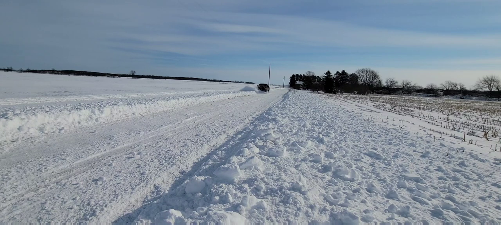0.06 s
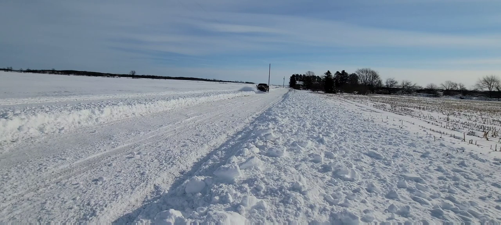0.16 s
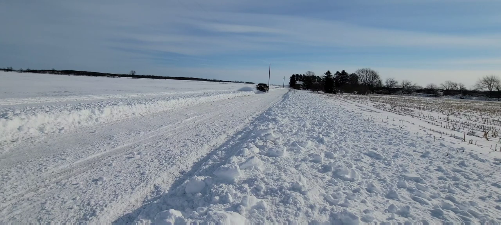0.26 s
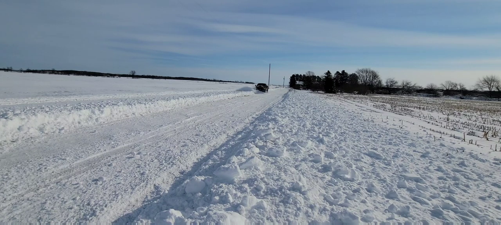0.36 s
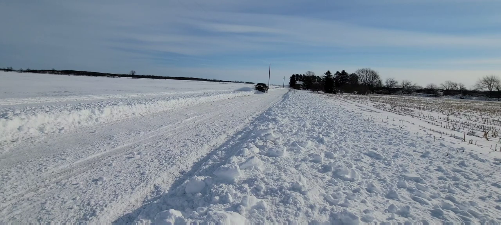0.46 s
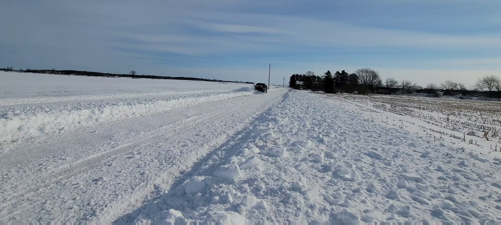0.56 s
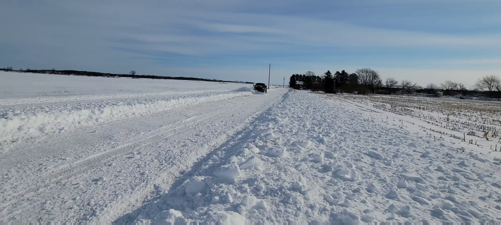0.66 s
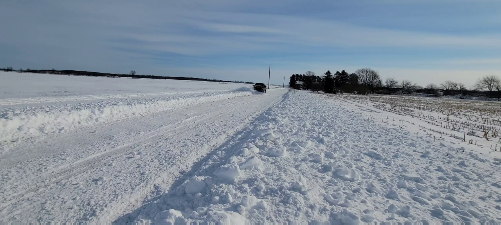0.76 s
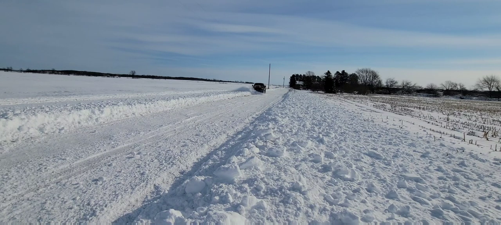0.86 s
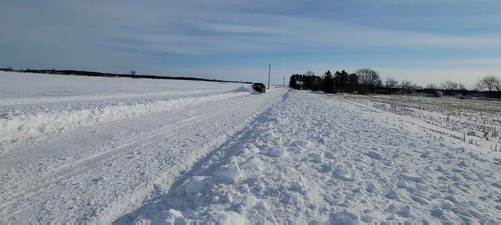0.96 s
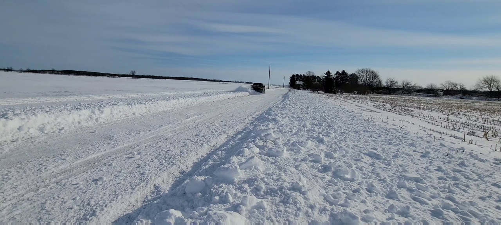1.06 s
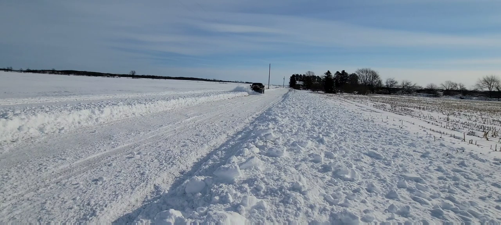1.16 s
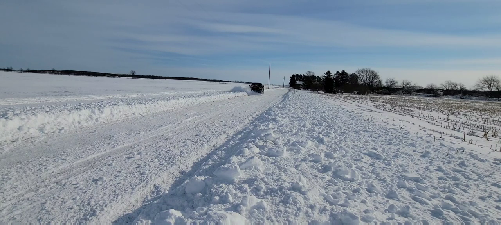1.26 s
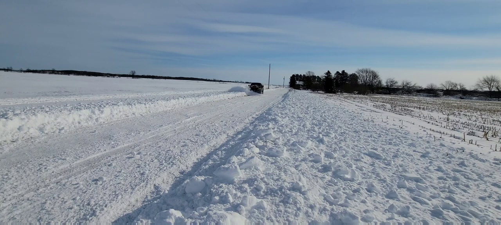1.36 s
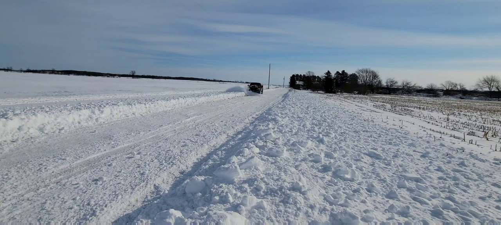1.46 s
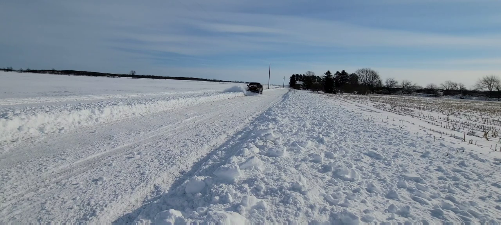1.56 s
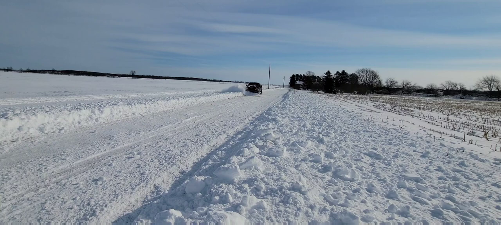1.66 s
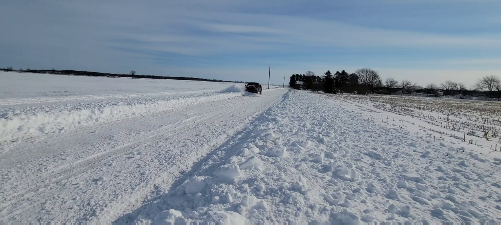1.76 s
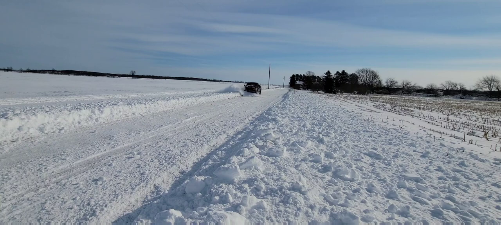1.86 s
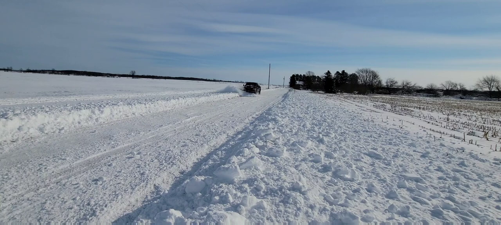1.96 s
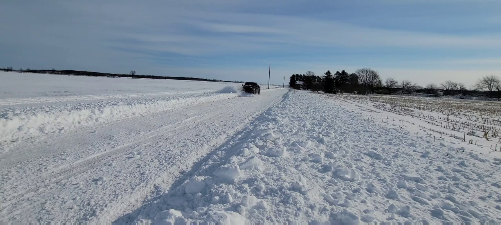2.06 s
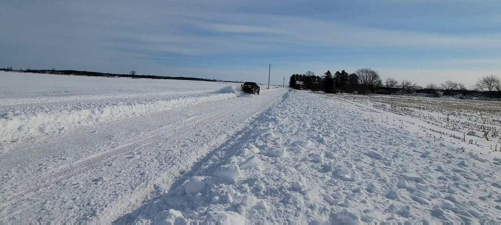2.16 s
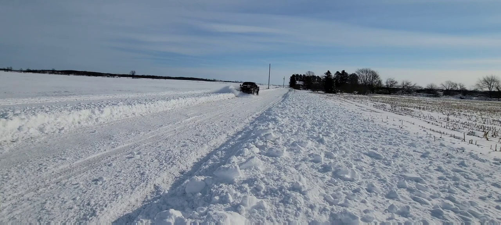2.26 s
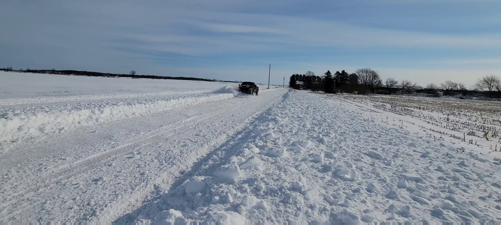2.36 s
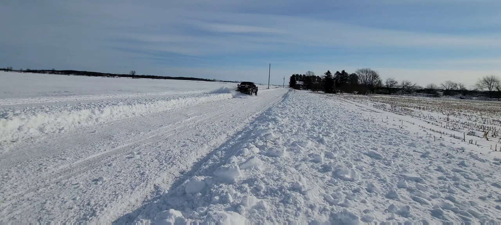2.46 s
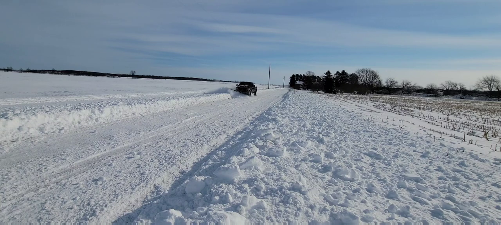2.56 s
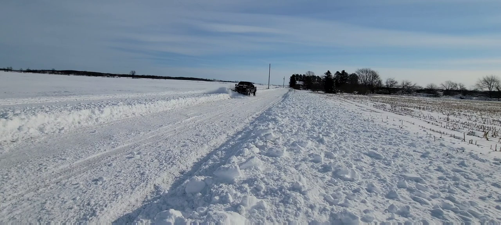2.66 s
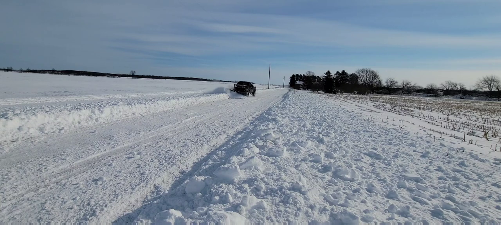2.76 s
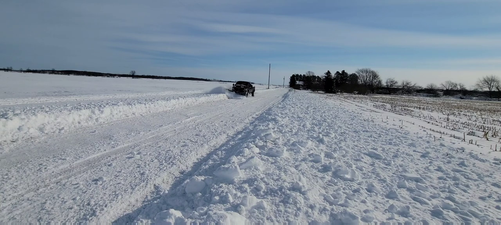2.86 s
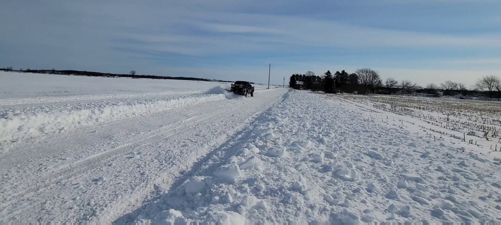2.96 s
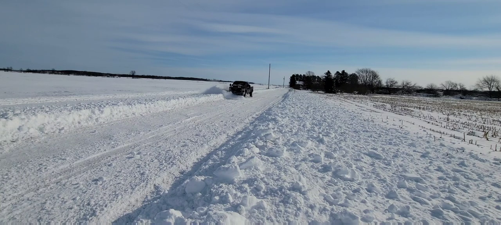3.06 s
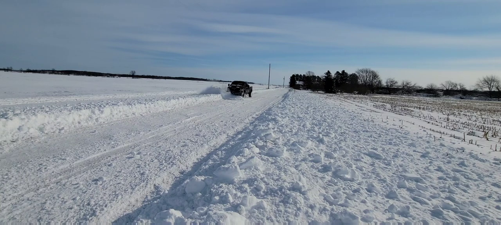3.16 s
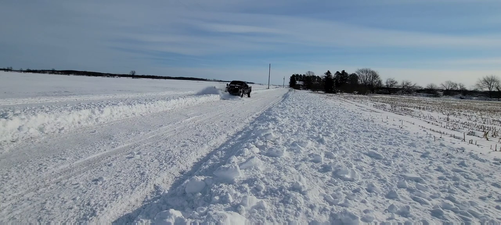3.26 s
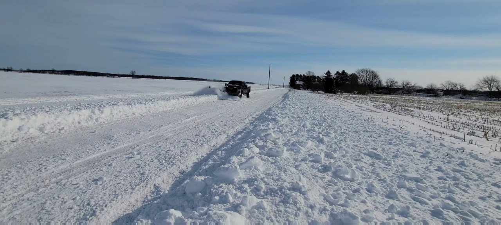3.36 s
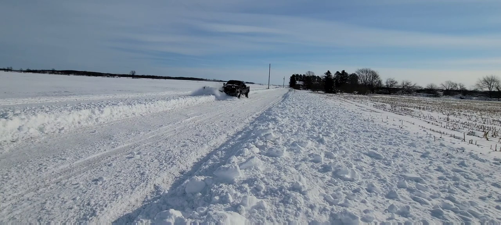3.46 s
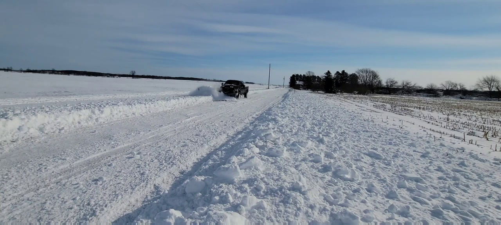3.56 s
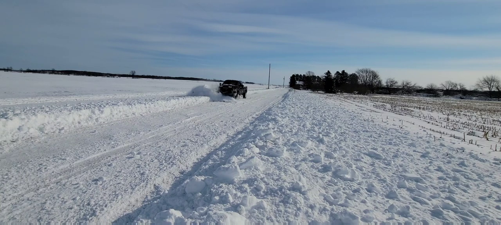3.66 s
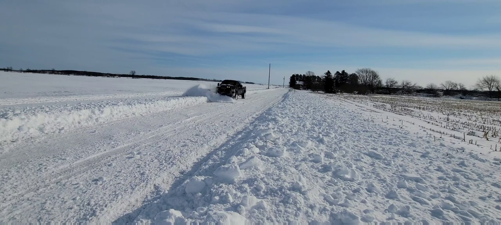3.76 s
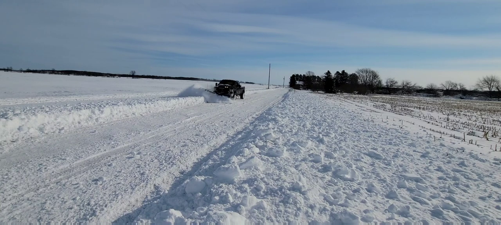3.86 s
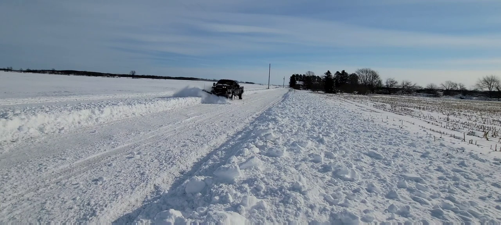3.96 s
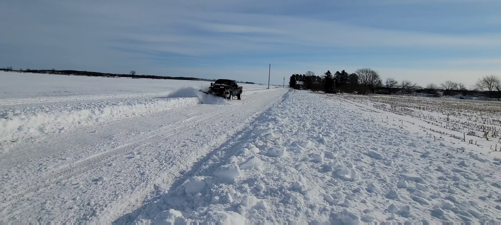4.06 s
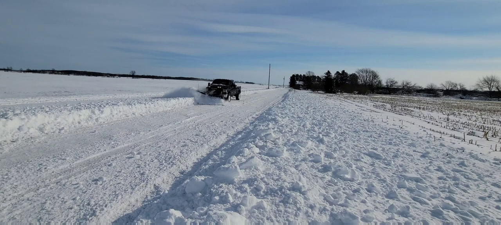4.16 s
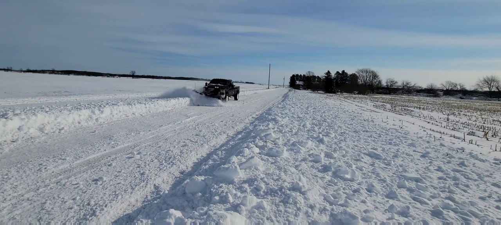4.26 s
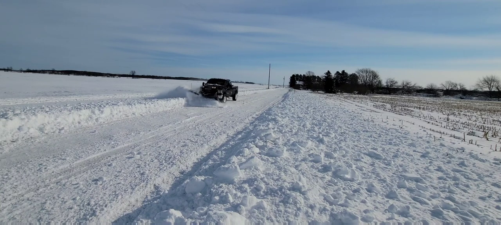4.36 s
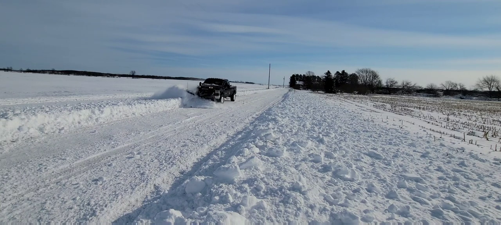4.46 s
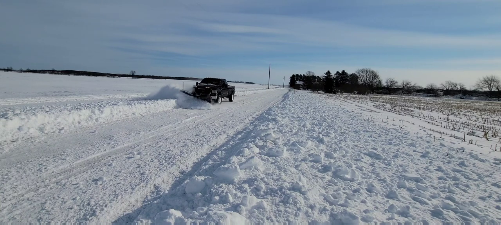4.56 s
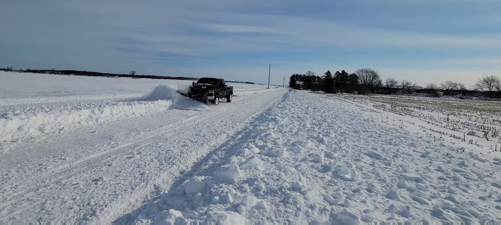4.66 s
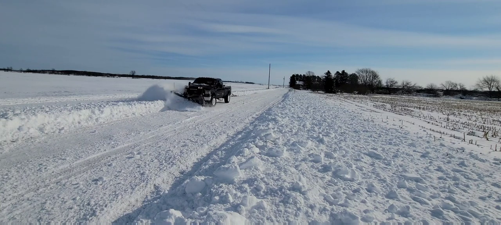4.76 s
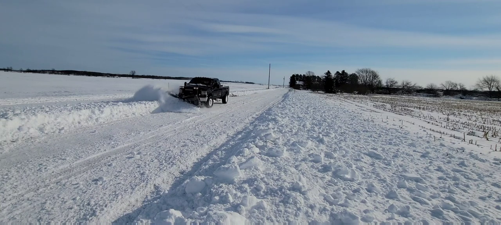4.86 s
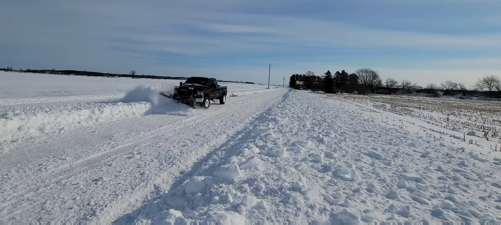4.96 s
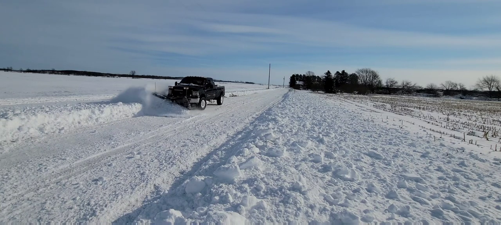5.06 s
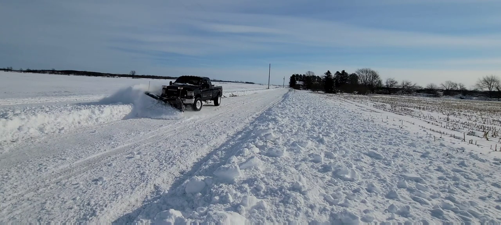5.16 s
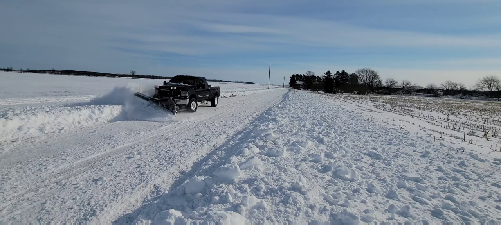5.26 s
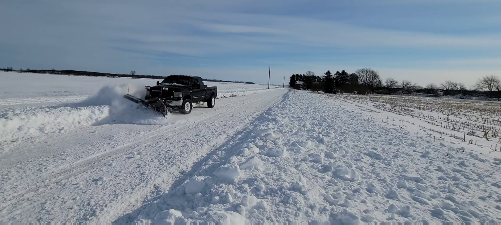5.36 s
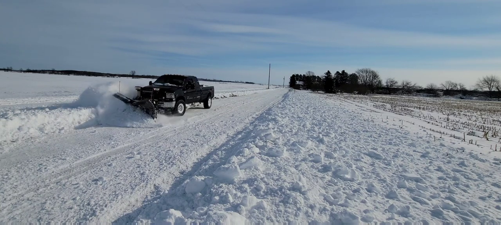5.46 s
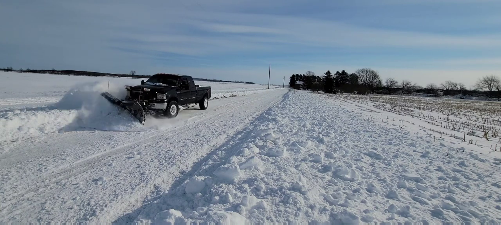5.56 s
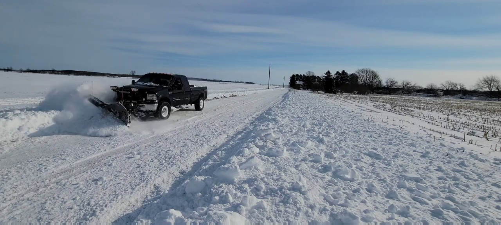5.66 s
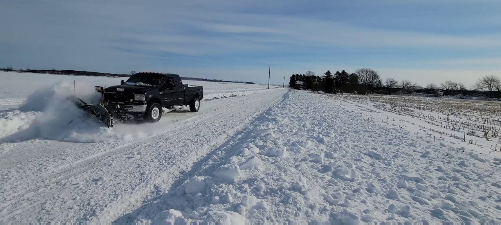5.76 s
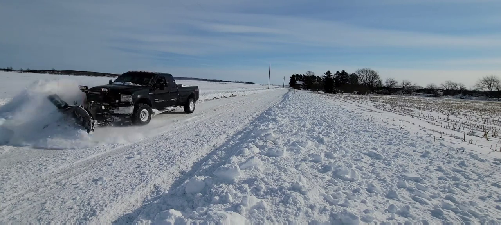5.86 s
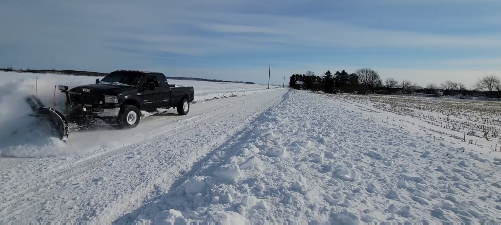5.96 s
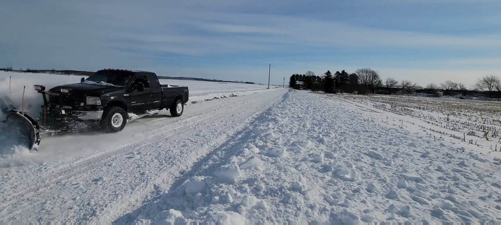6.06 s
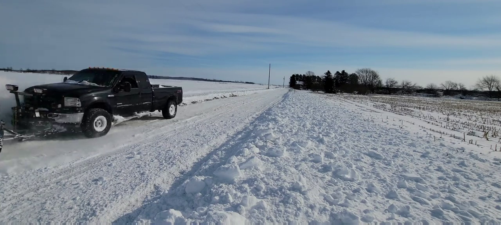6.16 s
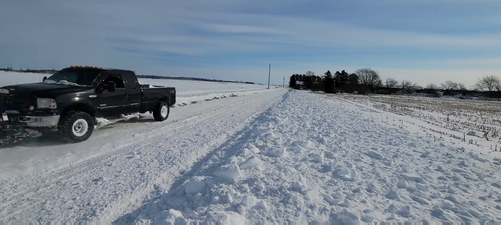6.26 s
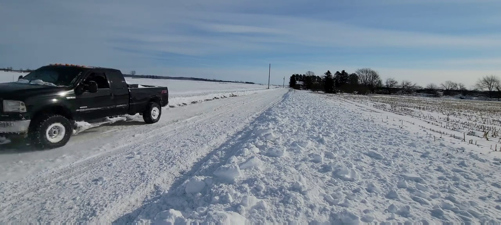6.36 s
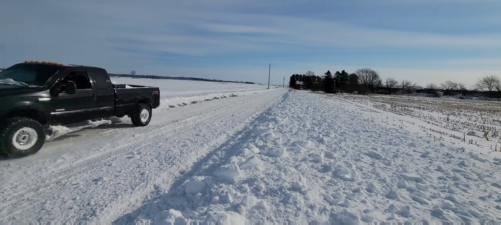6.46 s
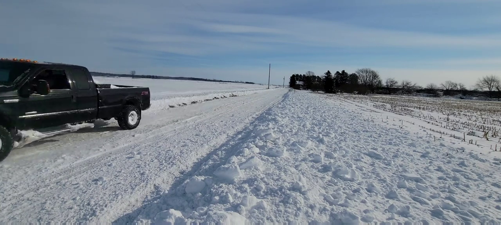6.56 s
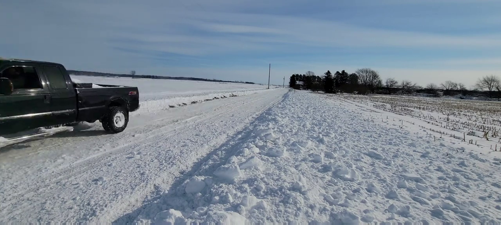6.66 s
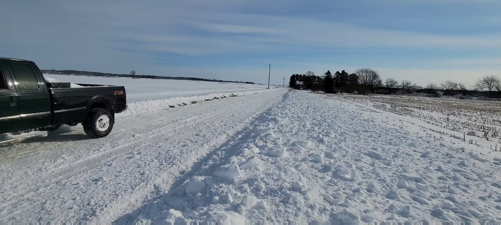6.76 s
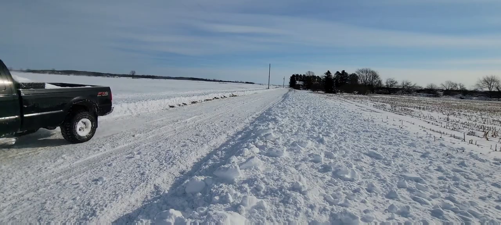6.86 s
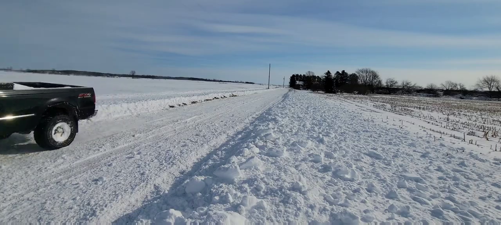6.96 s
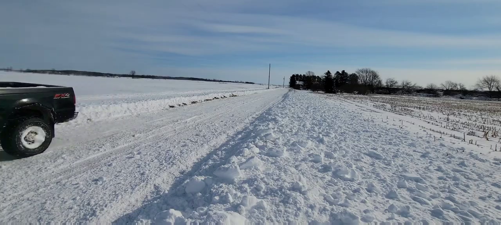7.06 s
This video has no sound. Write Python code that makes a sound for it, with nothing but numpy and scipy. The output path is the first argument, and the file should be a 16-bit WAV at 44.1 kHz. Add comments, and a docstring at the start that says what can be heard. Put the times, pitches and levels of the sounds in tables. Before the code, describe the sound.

Heard in wide stereo from a phone beside a country road, a pickup plows snow toward the listener. The low engine drone rises and dips under a rough, crunching scrape and frequent thuds from the blade. Everything builds as the truck approaches, with the heaviest bangs late on. Loose steel parts then rattle and squeak over a thin whine, with the truck close on the left.

```python
"""An engine drones in the distance, then grows louder: a pickup is plowing a snowy country road.
Its eight cylinders fire in turn to make the drone, which swells with three pushes of the throttle.
The blade scrapes, rumbles and bangs on frozen bumps, while steel parts squeak and clink.
With a faint, high whine, the truck draws almost level on the left of a phone, whose two microphones
hear it with a growing gap in time. The phone then widens the stereo."""
import sys
import numpy as np
from scipy import signal
from scipy.fft import rfft, irfft
from scipy.io import wavfile
from scipy.ndimage import uniform_filter1d, map_coordinates

SR = 44100
rng = np.random.default_rng(int(sys.argv[2]) if len(sys.argv) > 2 else 0)


def int16_out(signal):
    """Quantize to a 16-bit WAV file."""
    q = np.round(np.clip(np.atleast_2d(signal).T, -1, 1) * 32767)
    wavfile.write(sys.argv[1], SR, q.astype(np.int16))


N = 312838
TIME = np.arange(N) / SR
SPEED_M_S, LEVEL_AT_S, KERB_M = 7.7, 7.296, 6.24  # a straight path, KERB_M to the side of the phone

# Short steel squeaks and one long, faint whine.
# Each row: start in seconds, length in seconds, pitch in Hz, level in dB.
SQUEAKS_AND_WHINE = [(0.312, 0.055, 1500, -57), (.58, 0.11, 1470, -54), (1.02, 0.05, 1480, -47),
                     (1.13, 0.051, 1530, -42.5), (1.495, .05, 1510, -48), (2.294, 0.06, 2870, -46.5),
                     (5.286, 0.21, 14350, -42), (5.375, .12, 15550, -56), (5.692, 0.052, 14090, -40),
                     (5.76, 0.084, 14300, -36.5), (5.935, 0.088, 1370, -41), (5.914, 0.22, 14300, -34),
                     (5.917, 0.091, 15600, -39), (6.07, 0.067, 15580, -42), (5.954, 1.1, 10600, -53),
                     (6.946, 0.04, 14500, -33.5)]
# Loose parts knocking. Each row: start in seconds, strength in dB.
CLINKS = [(5.873, -19), (6.234, -25), (6.355, -20), (6.5005, -10.5), (6.591, -19.5), (6.7211, -11),
          (6.775, -15), (6.9227, -21)]
# The notes of a steel link. Each row: pitch in Hz, level in dB, seconds to fade by 60 dB.
LINK_NOTES = [(5230, 4, .07), (5600, -1, .09), (6630, -2, .05), (7100, -7, .05), (8260, -6, .09),
              (12440, -16, .06), (14950, -14, .05)]
# The blade on the road. Each row: time in seconds, scrape swell in dB, treble swell in dB.
BLADE_SWELLS = [(0, -2.5, -1), (.59, -11.5, -1), (1.18, -1, 0.5), (1.78, 0, 0.5), (2.15, 5, 6),
                (2.59, -0.5, -5.5), (3.1, 1, -5), (3.57, 5.5, 2.5), (4.11, -1.5, 0.5), (4.88, 5.5, 3),
                (5.31, 4, 5), (5.86, 1, 2.5), (6.26, -5, -1), (6.71, -1.5, 3.5), (7.09, -8.5, -2)]
# Rumble, crunch, scrape, edge ring, hiss and spray. Each row: base level in dB, how steeply it grows
# with nearness, then how much it follows the scrape swell, the treble swell and the firing tone.
BLADE_LAYERS = [(-22, 1.16, 0.64, .02, -0.15), (-21, 1.43, 0.34, 0.026, 0.1648),
                (-29.5, 1.11, 1.09, .02, 0.02), (-36, 1.014, 0.018, 1.25, 0.02),
                (-34.5, 1.17, 0.27, 0.52, 0), (-36, 1.115, .02, 0.057, 0.28)]
# The borders in Hz of the five layers above the rumble.
LAYER_EDGES_HZ = (200, 700, 2000, 3800, 8500, 16000)
# The tone of the rumble, the scraping and a bang. Each row: frequency in Hz, level in dB.
RUMBLE_TONE = [(20, -38), (40, -1.5), (65, 5.5), (90, -1), (130, 1), (200, -2.5), (260, -30)]
SCRAPE_TONE = [(200, 0), (390, -5.5), (500, -11), (1000, -8), (1500, -8), (2050, -18.5), (3000, -14.5),
               (3700, -20.5), (4600, -23.5), (5600, -19.5), (7200, -26), (9800, -35.5), (10900, -35),
               (12400, -25.5), (16000, -35)]
BANG_TONE = [(120, -15), (200, -0.5), (273, -8.5), (409, -12), (1270, -9), (2050, -20), (2560, -25),
             (5230, -28.5), (5940, -30.5), (8420, -41.5), (10900, -50), (12400, -39), (16000, -50)]
# Frozen bumps. Each row: start in seconds, level in dB, extra dB for the boom, extra dB for the crack.
BANGS = [(0.154, -43, -1, -8), (0.277, -48, -10.5, 3.5), (0.4, -46, -10, -3), (0.759, -47, -3, 5),
         (0.783, -47, -10, 5.5), (0.875, -33.5, -6, -5.5), (0.968, -35.5, -4, -4.5), (1.06, -35.5, -1, -6),
         (1.082, -34, -7, -8), (1.223, -28, -0.5, -7.5), (1.34, -38, -12, -14), (1.421, -41, -5, -1),
         (1.538, -28.5, -4, -10), (1.572, -38, -10, -20), (1.639, -39, 4, -5.5), (1.767, -43.5, 11, 7.5),
         (2.008, -29, -16, -8.5), (2.029, -31.5, -4, -2), (2.056, -19.5, -2.5, -2), (2.081, -25, -23, -17),
         (2.149, -23.5, -5, -9.5), (2.209, -33, 4.5, -11.5), (2.28, -36.5, -10, -2.5),
         (2.427, -35, 2.5, -17), (2.596, -31, -6, -13), (2.643, -35.5, 3.5, -23), (2.789, -27.5, -6, -10),
         (2.992, -31.5, -5, -30), (3.124, -27.5, 1.5, -14), (3.253, -29, -1, -11.5),
         (3.539, -25.5, -18, -26), (3.566, -19, 0, -5), (3.626, -27, -21, -11), (3.701, -31, 9.5, -6),
         (3.891, -29.5, -3, -29), (4.134, -33, 2, -17), (4.3, -32, 2, -25), (4.378, -31, -14, -19),
         (4.49, -37, -14, -20), (4.567, -25, -22, -14), (4.643, -23, -19, -6), (4.758, -30.5, -24, -27),
         (4.839, -25, -14, -27), (4.933, -28, 5, -29), (5.25, -12, 1, -5), (5.289, -27, -10, -0.5),
         (5.371, -21, 5.5, -9), (5.596, -14, 2.5, 0), (5.699, -43, 0, 7), (5.771, -22.5, -2, -1.5),
         (5.87, -33, -3, 5.5), (5.909, -16.5, 2, 5), (6.163, -30.5, 3.5, 0), (6.456, -26, 6, -14),
         (6.889, -23.5, -8, -7), (6.931, -18, -10, -2.5)]
# The blade's low notes. Each row: pitch in Hz, level in dB, seconds to fade by 60 dB.
BOOM_NOTES = [(87.7, 7, 0.16), (124.1, 3.5, 0.17), (62.6, -35, 0.18)]
# The throttle. Each row: time in seconds, firings per second, firing tone in dB at the kerb distance.
THROTTLE = [(0, 147.5, -19.5), (.6, 152, -9), (1.05, 153.8, -8.5), (1.35, 146.6, -11.5), (1.55, 140, -24),
            (2.0, 129.7, -22), (3, 131.3, -22), (3.3, 141.6, -17.5), (3.85, 147, -15), (4.5, 150, -9.5),
            (5, 152.6, -6), (5.15, 150.5, -8), (5.24, 139.6, -18), (5.8, 136.7, -19.5), (6.3, 141.4, -24),
            (6.55, 140.2, -25.5), (6.75, 138.9, -17), (7.09, 140.1, -18)]
# Tones from uneven cylinders. Each row: multiple of the engine's cycle rate, relative level in dB.
UNEVEN_TONES = [(3, -22), (5, -9), (6, -6), (7, -14.5), (9, -6.5), (10, -1), (11, -7), (12, -14), (16, -16),
                (18, -16)]
# The phone's body shades the mid range. Each row: time in seconds, left minus right in dB.
PHONE_SHADE = [(0, -4), (2.5, -2), (4, 0.1), (5, 1.6), (5.8, 3.5), (6.4, 3.5), (7.09, 4)]
# How the two microphones differ. Each row: frequency in Hz, left minus right in dB.
MIC_BALANCE = [(200, -0.5), (600, -0.66), (2500, -2.5), (4500, -8.5), (6000, -4.5), (7000, 1), (10500, 6),
               (12000, -7), (13500, 3.5), (15500, 14)]
# Sound scattered by snow banks. Each row: frequency in Hz, scattered share of the power in dB.
SCATTER_SHARE = [(30, -9), (120, -28), (600, -22.5), (2000, -14), (4000, -5), (8000, -2.5), (15000, -3)]
# Stereo widening. Each row: frequency in Hz, boost of the left-right difference in dB.
WIDENING = [(150, 4), (260, 1), (400, 6.5), (900, 3), (2000, -0.5), (5000, 0)]


def undb(db):
    """Turn decibels into a multiplier."""
    return 10 ** (np.asarray(db) / 20)


def curves(table):
    """Join a table's timed points with straight lines, one curve per column."""
    seconds, *columns = np.transpose(table)
    return [np.interp(TIME, seconds, column) for column in columns]


def colour(x, table=((1, 0),), lo=0.74, hi=SR, slope=8):
    """Filter by (Hz, dB) points, fading out below lo and above hi."""
    hz = np.maximum(np.fft.rfftfreq(N, 1 / SR), 1)
    point_hz, point_db = np.transpose(table)
    gain = undb(np.interp(np.log(hz), np.log(point_hz), point_db))
    edge_loss = np.sqrt((1 + (lo / hz) ** slope) * (1 + (hz / hi) ** slope))
    return irfft(rfft(x) * gain / edge_loss, N)


def noise(table, lo=1., hi=SR):
    """Filtered noise with a typical size of 1."""
    x = colour(rng.standard_normal(N), table, lo, hi)
    return x / np.std(x)


def wander(rate):
    """A smooth random wobble of size about 1, with `rate` new values a second."""
    hold = int(SR / rate)
    steps = np.repeat(rng.standard_normal(N // hold + 1), hold)
    smooth = uniform_filter1d(uniform_filter1d(steps, hold), hold)[:N]
    return smooth / np.std(smooth)


def ring(x, hz, fade_s):
    """One note, struck by x, that dies away."""
    pole = np.exp(2j * np.pi * hz / SR - np.log(1000) / (fade_s * SR))
    return signal.lfilter([1], [1, -pole], x).imag


def distance():
    """Metres from truck to phone."""
    return np.hypot(SPEED_M_S * (TIME - LEVEL_AT_S), KERB_M)


def beyond(metres):
    """0 while the truck is well inside this distance, 1 well outside."""
    return 1 / (1 + (metres / distance()) ** 8)


def snow_scatter(x):
    """Many small echoes off the snow banks shuffle the timing (phase) of the waves."""
    slices = signal.stft(x, nperseg=512)[2]
    shuffled = slices * np.exp(2j * np.pi * rng.random(slices.shape))
    echoes = signal.istft(shuffled, nperseg=512)[1][:N]
    return echoes * np.std(np.diff(x)) / np.std(np.diff(echoes))


def squeaks_and_whine():
    """Short steel squeaks, plus one faint, thin, high whine as the truck draws near."""
    out, flutter = np.zeros(N), undb(1.36 * wander(60))
    for start, length, hz, db in SQUEAKS_AND_WHINE:
        i, n = int(start * SR), int(length * SR)
        edges = hz * (1 + 0.023 * np.array([-.5, .5]))  # 2.3% of the pitch wide
        band = signal.butter(1, edges, "band", fs=SR, output="sos")
        tone = signal.sosfilt(band, rng.standard_normal(2 * SR))
        out[i:i + n] += undb(db) * tone[SR // 2:][:n] / np.std(tone) * signal.windows.tukey(n, .3)
    return out * flutter


def clinks():
    """Loose steel rattles and rings; each knock brings out a new mix of its notes."""
    starts, db = np.transpose(CLINKS)
    mix_db = 3.4 * rng.standard_normal((len(starts), len(LINK_NOTES)))
    knocks = np.zeros(N)
    knocks[(starts * SR).astype(int)] = undb(db)
    burst = rng.standard_normal(600) * np.exp(-np.arange(600) / 150)
    rattle = np.convolve(knocks, burst)[:N]
    out = colour(rattle, [(3000, -32), (5000, -24), (7500, -12), (9500, -12), (12000, -6), (15500, -11)])
    last_knock = np.clip(np.searchsorted(starts, TIME) - 1, 0, None)
    for k, (hz, note_db, fade_s) in enumerate(LINK_NOTES):
        out += ring(rattle * undb(note_db - 29 + mix_db[last_knock, k]), hz, fade_s)
    return out


def blade_scrape():
    """The blade drags along in six layers of noise; lumps of ice jolt all but the rumble."""
    scrape_db, treble_db = curves(BLADE_SWELLS)
    push_db = curves(THROTTLE)[1]  # a harder push throws more snow
    near_db = 20 * np.log10(KERB_M / distance())
    rumble_db, *layer_db = [db + near * near_db + scrape * scrape_db + treble * treble_db + push * push_db
                            for db, near, scrape, treble, push in BLADE_LAYERS]
    lumps = (rng.random(N) < 40 / SR) * undb(-14 * rng.random(N))  # about 40 a second
    jolt = uniform_filter1d(signal.lfilter([1], [1, -np.exp(-1 / (0.0071 * SR))], lumps), size=100)
    jolt *= np.interp(TIME, [5.8, 6.3], [1, .4])  # close by, smooth tyre rush takes over
    out = undb(rumble_db + 2.9 * wander(20)) * noise(RUMBLE_TONE, hi=330)
    shared = wander(16)
    roughness = [(.77, .28, 1.23), (1.46, .77, 2.5), (1.2, .23, 1.7), (.95, .2, 1.5), (.39, .23, .52)]
    for db, lo, hi, rough in zip(layer_db, LAYER_EDGES_HZ, LAYER_EDGES_HZ[1:], roughness):
        jolt_share, shared_db, own_db = rough
        flicker_db = shared_db * shared + own_db * wander(25)
        out += undb(db + flicker_db) * (1 + jolt_share * jolt) * noise(SCRAPE_TONE, lo, hi)
    return out


def blade_bangs(near_fade_s=0.28, far_fade_s=0.14):
    """Each bump thuds, cracks and sets the blade booming, and its edge chatters on over the ice."""
    kicks, loudness = np.zeros(N), np.zeros((3, N))
    edges_hz = (200, 750, 2300, 16000)  # three bands: thud, middle, crack
    fade_speeds = np.array([[.8], [1], [1.2]])
    thud_db = 0.5 - 10.5 * beyond(metres=16.4)  # far off, snow soaks up the thud
    fade_s = near_fade_s + (far_fade_s - near_fade_s) * beyond(metres=14.6)
    t = TIME[:SR // 2]
    rise = 1 - np.exp(-t / 0.0018)
    for start, db, boom_db, crack_db in BANGS:
        i = int(start * SR)
        pace, phase = rng.random(2)
        chatter = 1 + 0.11 * np.sin(2 * np.pi * ((60 + 50 * pace) * t + phase))
        fall = 0.72 * np.exp(-t / 0.0044) + 0.94 * chatter * 1000 ** (-t / fade_s[i])
        gains = undb(db + np.array([[thud_db[i]], [0], [crack_db]]))
        loudness[:, i:i + len(t)] += (gains * rise * fall ** fade_speeds)[:, :N - i]
        kicks[i + 90] += undb(db + boom_db)
    hits = sum(level * noise(BANG_TONE, lo, hi) for level, lo, hi in zip(loudness, edges_hz, edges_hz[1:]))
    return hits + sum(undb(db) * ring(kicks, hz, fade) for hz, db, fade in BOOM_NOTES)


def steel_plates(x, ripple_db=2.0, spacing_hz=45):
    """The many notes of the blade's plates lift some pitches and lower others, above the bass."""
    hz = np.arange(200, 16000, spacing_hz)
    db = (hz > 300) * ripple_db * rng.standard_normal(1000)[:len(hz)]
    return colour(x, np.transpose([hz, db]))


def engine():
    """Eight firings a cycle make the exhaust drone; cylinders that differ add wavering tones."""
    firing_hz, tone_db = curves(THROTTLE)
    cycle = 2 * np.pi * np.cumsum(firing_hz * (1 + .003 * wander(12))) / (8 * SR)
    out = undb(tone_db + 1.2 * wander(25)) * np.sin(8 * cycle)
    bank_db = -27.5 - 0.089 * tone_db + 3 * wander(14)
    out += undb(bank_db) * np.sin(4 * cycle)  # a bank is one row of four cylinders
    for multiple, db in UNEVEN_TONES:
        uneven_db = db - 23 + 0.2 * tone_db + 2.5 * wander(5)
        out += undb(uneven_db) * np.sin(multiple * cycle + rng.uniform(0, 2 * np.pi))
    return np.sqrt(2) * out * KERB_M / distance()


def scene():
    """The truck reaches both microphones, partly direct and partly scattered."""
    truck = engine() + steel_plates(blade_scrape() + blade_bangs()) + clinks() + squeaks_and_whine()
    # Far off, the echo from the snow partly cancels a narrow band; nearer, that band is lifted.
    echo_db = 5 - 10.5 * beyond(metres=29)
    truck += colour(truck, lo=517, hi=584) * (undb(echo_db) - 1)
    left_lead_ms = 0.69 * KERB_M / distance() - 0.11
    shift = left_lead_ms * SR / 1000 / 2
    shade_db = curves(PHONE_SHADE)[0]
    direct_share = [(hz, 10 * np.log10(1 - undb(2 * db))) for hz, db in SCATTER_SHARE]
    mics = []
    for sign in (1, -1):  # left, then right
        direct = map_coordinates(truck, [np.arange(N) + sign * shift], order=5, mode="nearest")
        heard = colour(direct, direct_share) + colour(snow_scatter(truck), SCATTER_SHARE)
        heard = colour(heard, [(hz, sign * db / 2) for hz, db in MIC_BALANCE])
        mid_range = colour(heard, lo=520, hi=3300, slope=4.3)
        mics.append(heard + mid_range * (undb(sign * shade_db / 2) - 1))
    return np.array(mics)


def record(dry):
    """The phone widens the stereo, drops the lowest bass, rounds the peaks and cuts the top treble."""
    centre = (dry[0] + dry[1]) / 2
    side = colour((dry[0] - dry[1]) / 2, WIDENING)
    bass_cut = signal.butter(2, 38, "high", fs=SR, output="sos")
    treble_cut = signal.ellip(10, .2, 75, 15800, fs=SR, output="sos")
    wide = signal.sosfilt(bass_cut, [centre + side, centre - side])
    return signal.sosfilt(treble_cut, np.tanh(.9 * wide) / .9)


dry = scene()
out = record(dry)
int16_out(out)
```